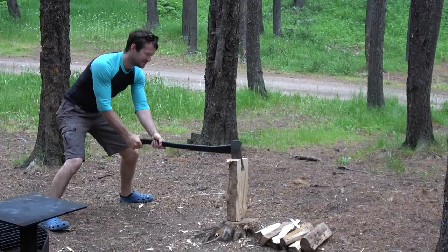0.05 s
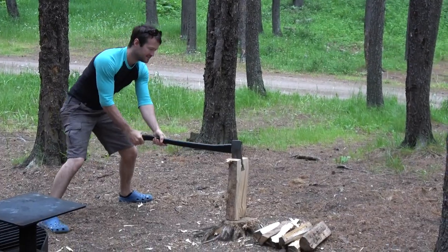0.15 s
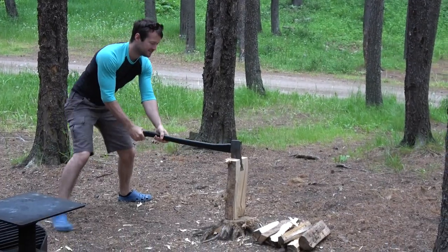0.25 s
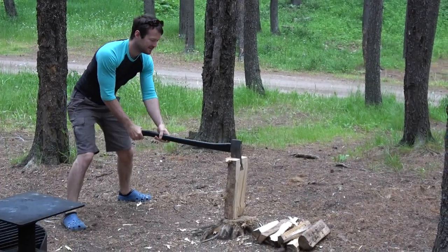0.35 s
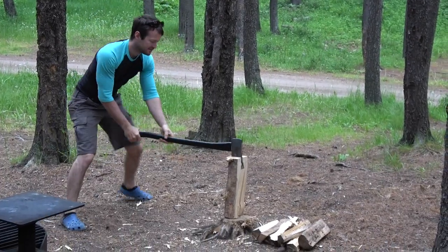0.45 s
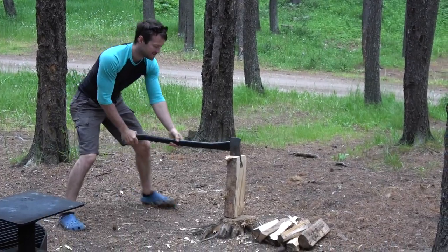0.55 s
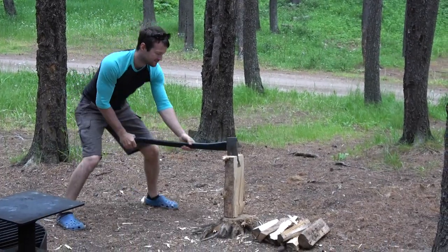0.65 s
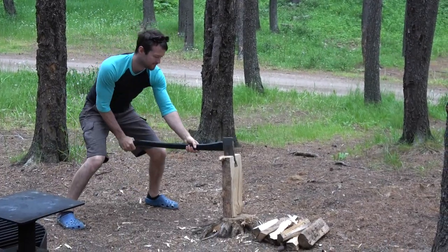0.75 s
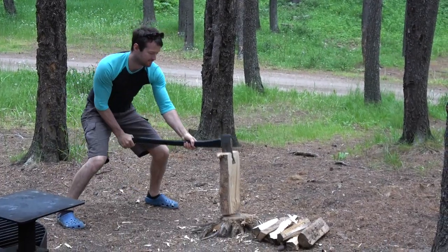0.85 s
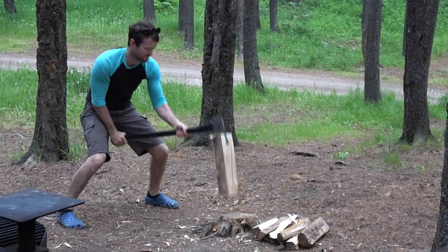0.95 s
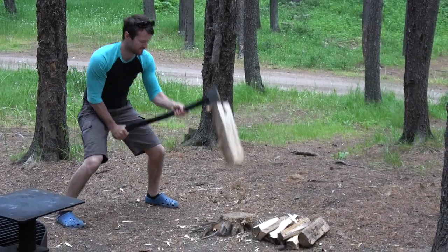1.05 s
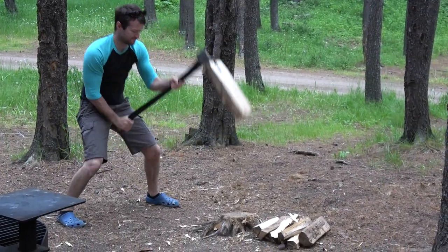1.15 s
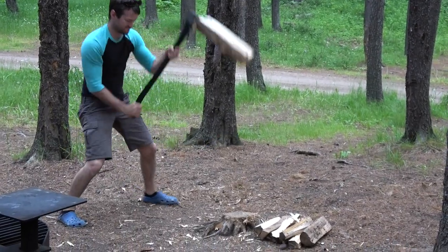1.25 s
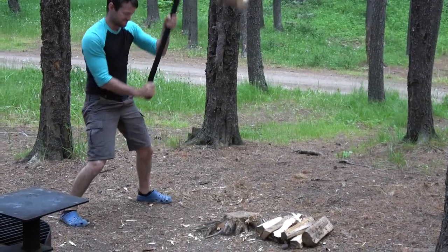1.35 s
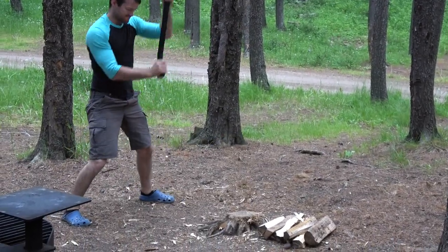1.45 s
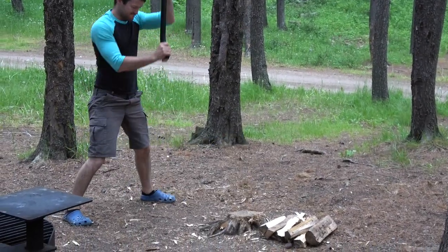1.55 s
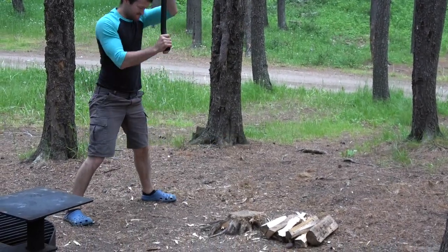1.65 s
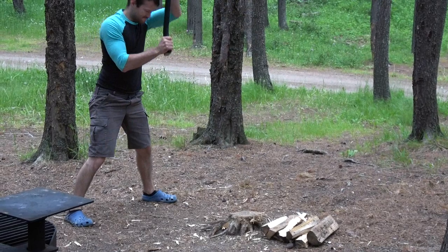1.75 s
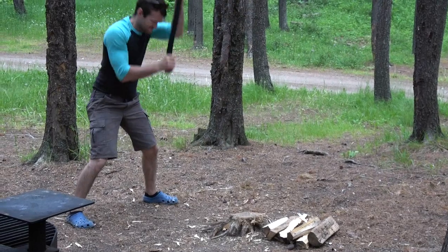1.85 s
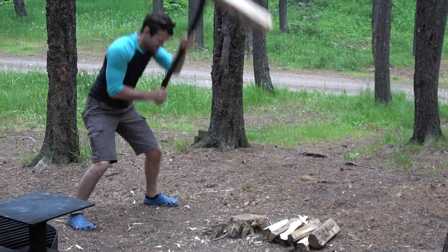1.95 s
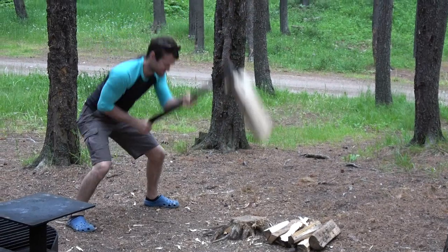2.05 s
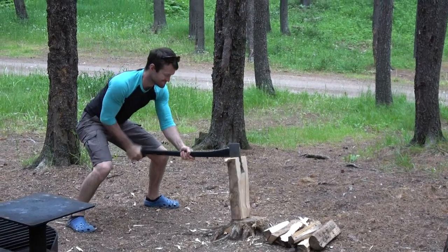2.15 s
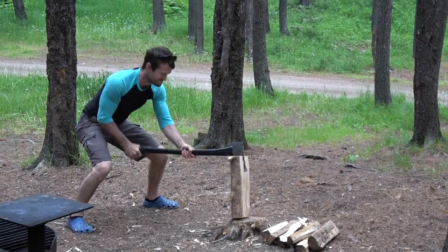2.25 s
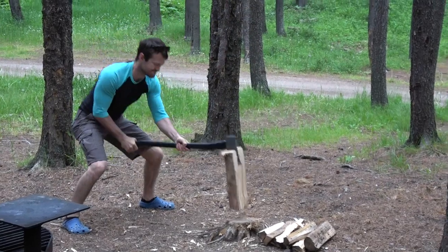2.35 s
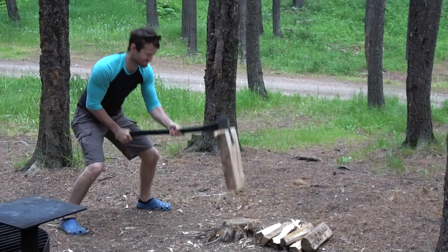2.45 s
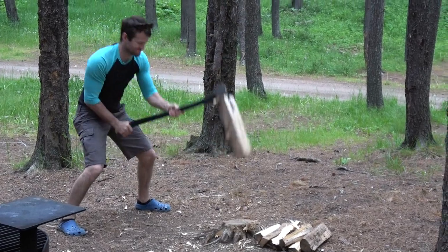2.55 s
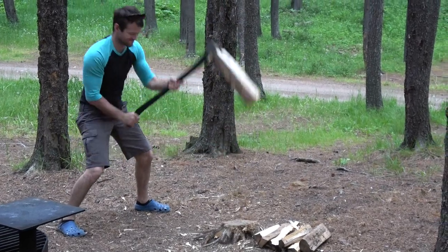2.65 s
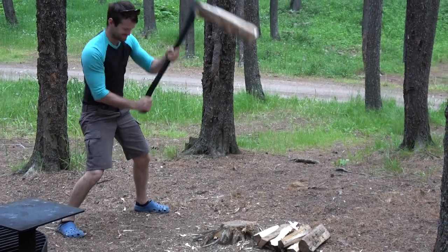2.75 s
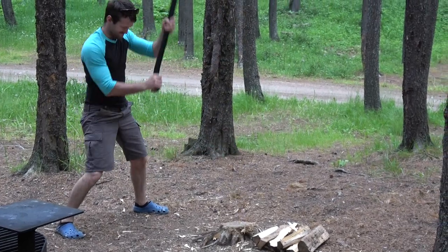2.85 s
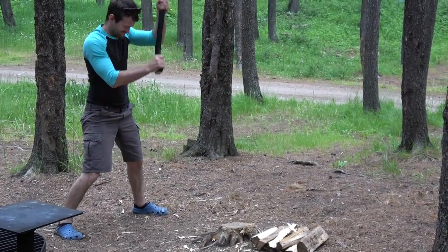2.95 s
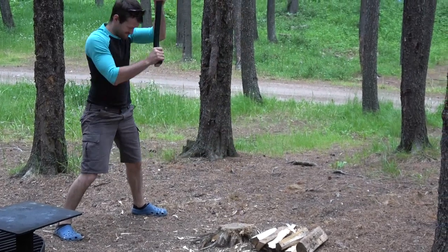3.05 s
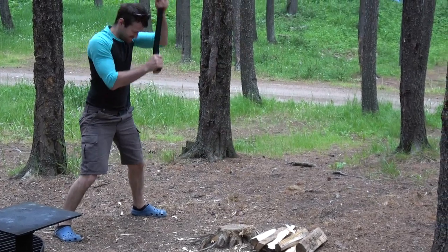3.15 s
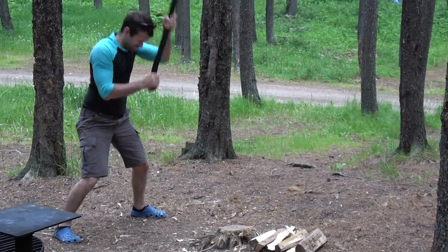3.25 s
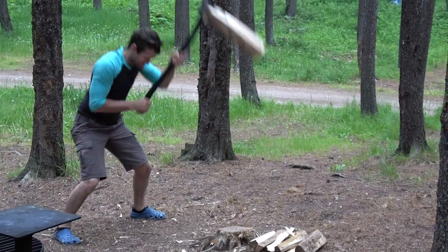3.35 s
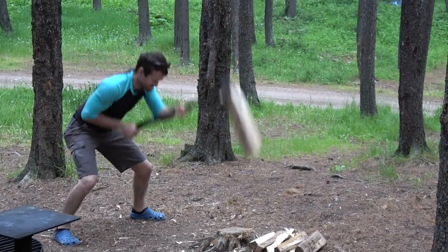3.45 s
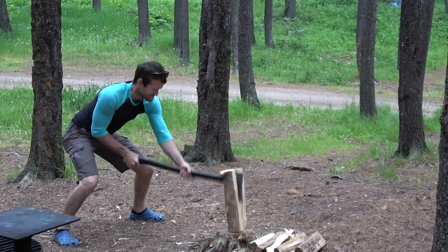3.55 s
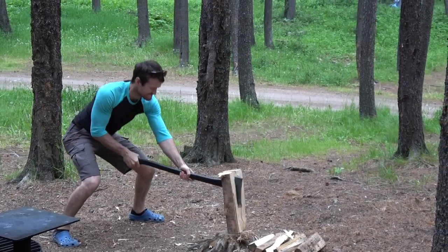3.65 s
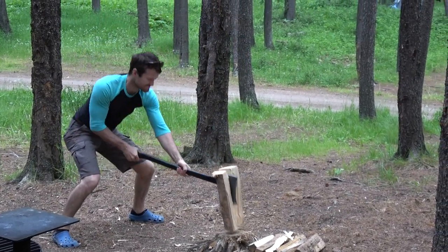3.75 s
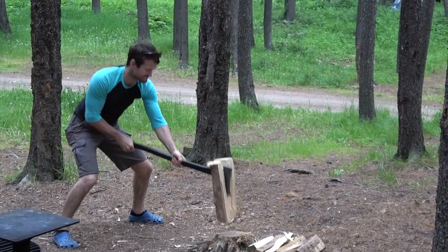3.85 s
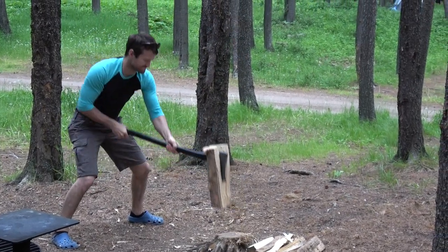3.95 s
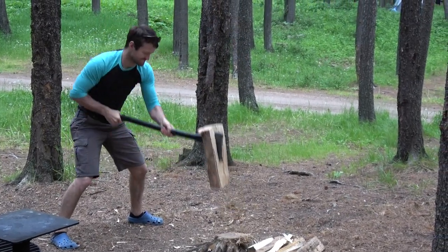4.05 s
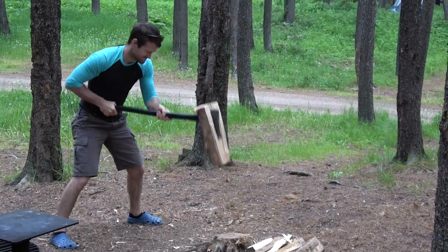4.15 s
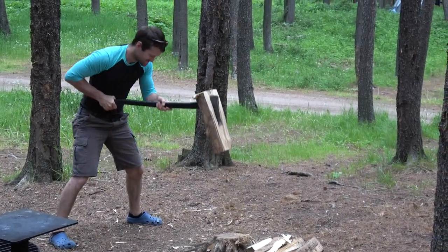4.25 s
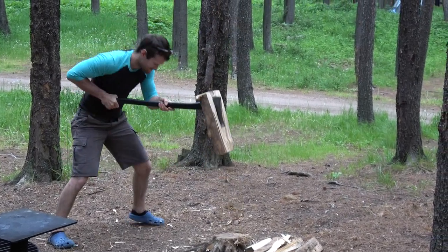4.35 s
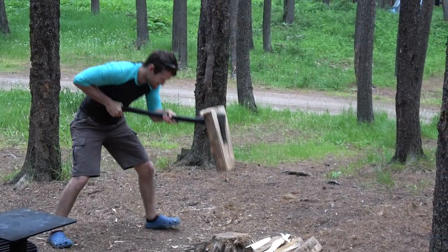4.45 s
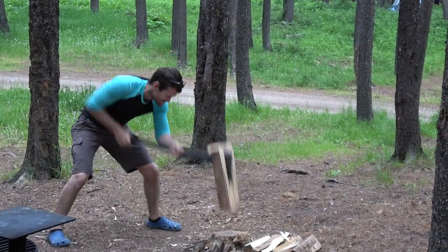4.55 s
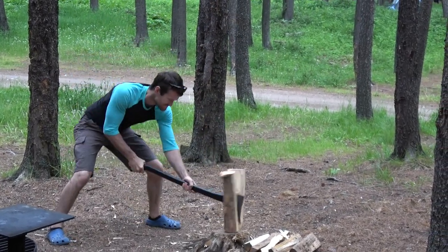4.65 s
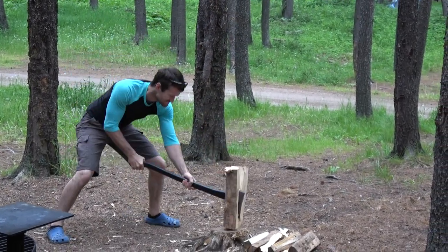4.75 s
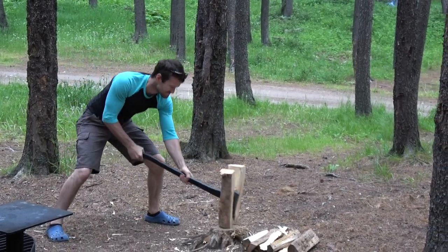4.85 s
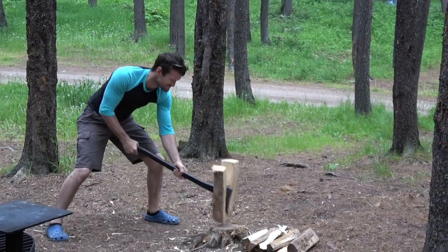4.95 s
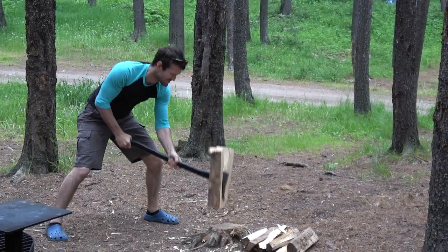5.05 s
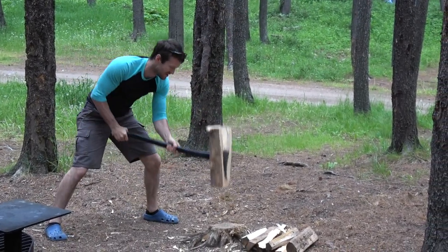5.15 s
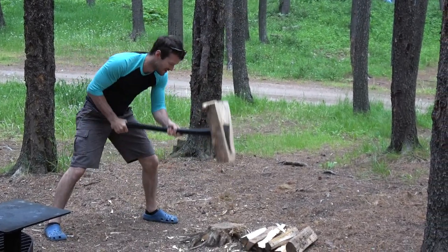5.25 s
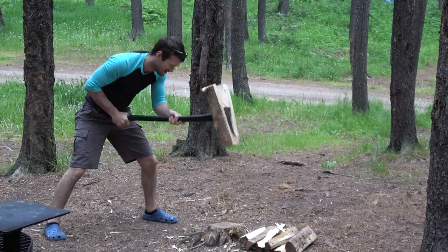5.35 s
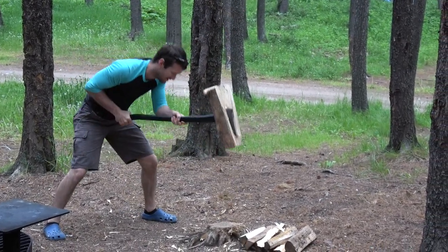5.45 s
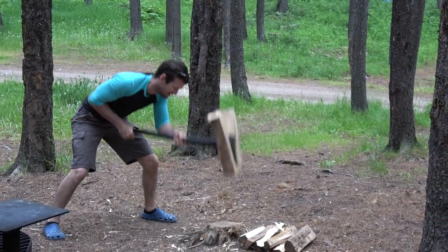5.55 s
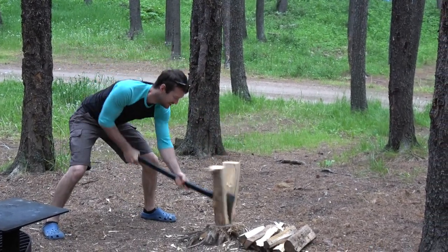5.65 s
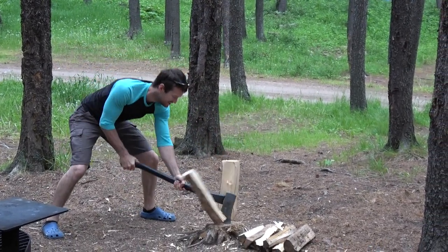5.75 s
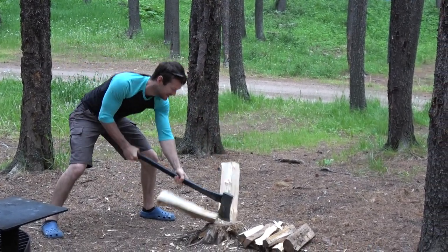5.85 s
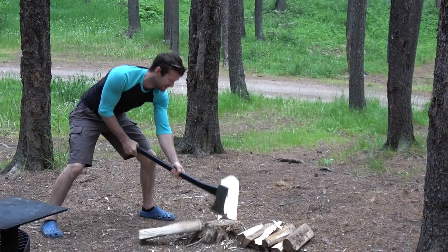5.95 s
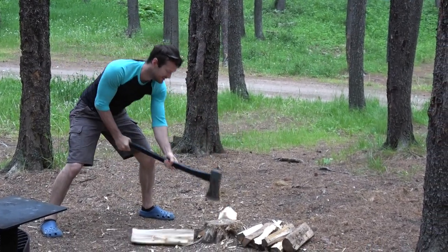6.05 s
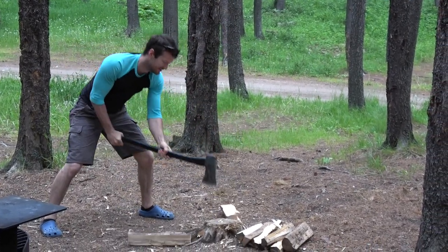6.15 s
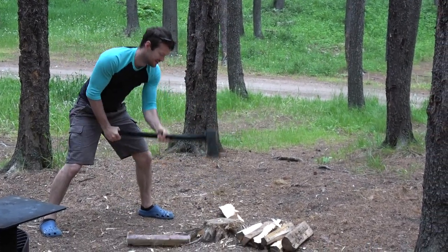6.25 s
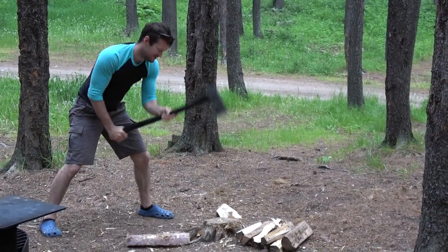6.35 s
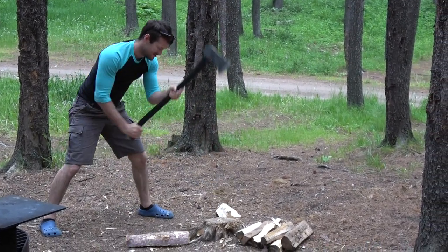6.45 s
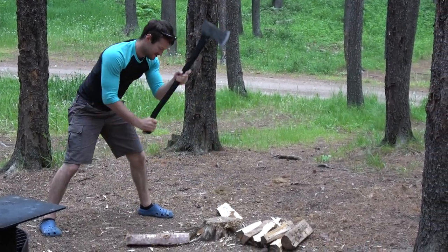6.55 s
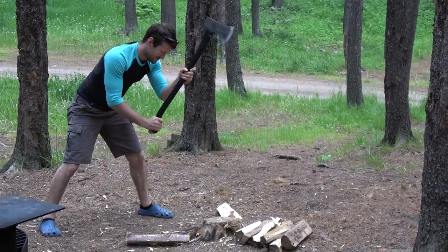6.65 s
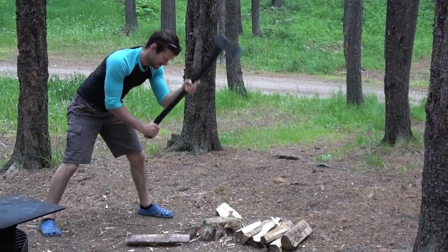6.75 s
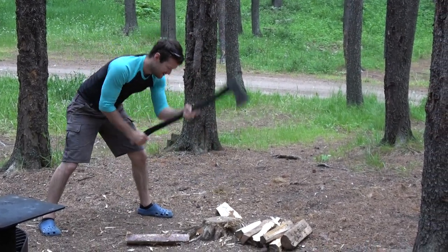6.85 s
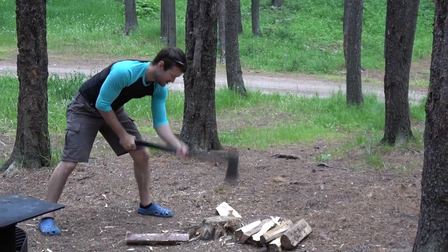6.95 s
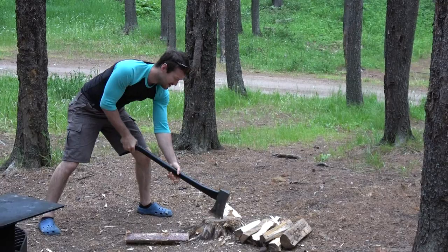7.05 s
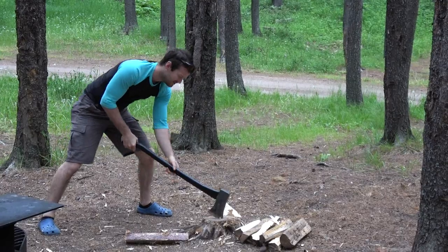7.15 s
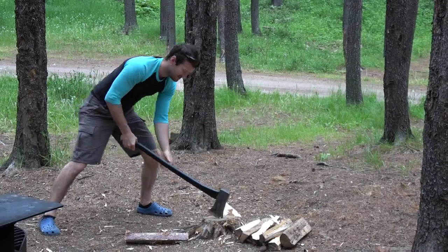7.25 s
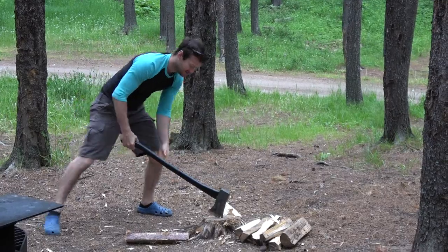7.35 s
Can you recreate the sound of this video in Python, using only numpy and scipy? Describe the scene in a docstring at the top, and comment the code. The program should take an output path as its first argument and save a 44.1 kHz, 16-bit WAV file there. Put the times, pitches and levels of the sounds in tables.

```python
"""A log stuck on an axe is slammed on a stump in a pine wood until it splits; the halves drop and the axe strikes one.
Each blow is a burst of noise for the cracking fibres, a ring of the log and a thud of stump and ground.
The blows bounce off things nearby and echo among the trunks as a fading wash of noise.
Shoes scuff dry needles in grainy noise, twigs tick in tiny fading tones, and the wood hushes far off.
A limiter holds down the hardest blows."""
import sys
import numpy as np
from scipy import signal
from scipy.fft import rfft, irfft, next_fast_len
from scipy.io import wavfile
from scipy.ndimage import uniform_filter1d, minimum_filter1d, map_coordinates

SR = 44100
rng = np.random.default_rng(int(sys.argv[2]) if len(sys.argv) > 2 else 0)


def ratio_of_db(decibels):
    """Turn decibels (scalar or array-like) into linear amplitude factors; 0 dB maps to 1."""
    return 10 ** (np.asarray(decibels, float) / 20)


def generate_wav(signal):
    """Clip the signal to [-1, 1] and save it as 16-bit WAV at the path in sys.argv[1]."""
    frames = np.transpose(np.atleast_2d(signal))
    scaled = np.clip(frames, -1, 1) * 32767
    pcm = np.round(scaled).astype(np.int16)
    wavfile.write(sys.argv[1], SR, pcm)


N = 326340  # samples in the scene
LEAD = SR  # samples made ahead of the start, so that an earlier blow can still echo

# Contacts of log, axe and stump; the row at 6.262 s is a twig tick, made the same way. Each row: start in
# seconds, then relative levels of crack, knock and thud in dB.
CONTACTS = [(-0.4, 7.5, -18, -10), (2.2887, 1.5, -3, -3.5), (2.3002, -17, -42, -14.5), (2.309, -7, -18, -4),
            (2.3164, -11, -19, -13.5), (3.0097, -21, -59, -53), (3.6933, -3.5, -13, -7),
            (3.6955, 0, -8, -17.5), (3.7072, 3.5, -1, 0.5), (3.7126, 3, -32, -14.5),
            (3.728, -16, -22, -19.5), (3.7433, -49, -19.5, -19.5), (3.764, -19, -25, -47),
            (4.6139, -38.5, -42, -57), (4.626, -38.5, -37.5, -59), (4.6471, -33.5, -42, -55),
            (4.6655, -32.5, -53, -53), (4.7649, 2.5, -11, -20.5), (4.7773, -26, -14.5, -20.5),
            (4.7867, -2, -14, -25), (4.7911, -12, -21, -20), (4.8011, -12.5, -10.5, -22),
            (4.8341, -19, -29, -33), (5.8091, -1.5, -17, -17.5), (5.8233, -48, -39, -23.5),
            (5.834, -21, -25, -21.5), (6.117, -25, -36.5, -29.5), (6.1497, -25.5, -41.5, -38),
            (6.175, -26.5, -44, -45), (6.2169, -25.5, -28.5, -28.5), (6.262, -27, -39, -49),
            (7.1672, -14.5, -31, -24), (7.1709, -40, -23.5, -15), (7.1896, -41, -33.5, -20.5),
            (7.237, -47, -44, -47)]
# A short dull noise just before each big blow. Each row: start in seconds, level in the log pitches in dB,
# level in the stump pitches in dB.
LEAD_INS = [(2.2738, -21.5, -33.5), (3.682, -28.5, -17), (4.75, -38.5, -37), (5.796, -38.5, -30),
            (7.158, -61, -30)]
# Ways the log rings before its brightness is tilted. Each row: pitch in Hz, width in Hz, relative level in dB.
LOG_RINGS = [(649, 126, -0.5), (898, 116, -4.5), (1145, 132, -2), (1678, 81, 3.5), (2210, 250, -6),
             (2960, 150, -6.5), (3840, 230, -6)]
# The loosest piece in each state of the wood; in the state from 6.245 s it is the ring of a ticking twig. Each
# row: pitch in Hz, width in Hz, relative level in dB.
LOOSE_PIECES = [(980, 60, -11), (689, 58, 1.5), (5000, 2500, 8), (1394, 125, 0.5), (1840, 90, 7),
                (2310, 910, 2), (1077, 23, 13), (910, 150, 5.5), (2920, 170, 26), (2080, 310, 6.5)]
# Ways the stump rings before its pitch is shifted. Each row: pitch in Hz, width in Hz, relative level in dB.
STUMP_RINGS = [(232, 84, -7), (318, 27.8, 1.5), (380, 28, -2), (467, 40, -2.5), (544, 117, -7.5)]
# The way the ground rings. Each row: pitch in Hz, width in Hz, relative level in dB.
GROUND_RINGS = [(115.2, 26.5, 0)]
# Tone colour of tearing fibres. Each row: frequency in Hz, relative level in dB.
CRACK_COLOUR = [(300, -40.5), (1000, 4), (3000, -0.5), (6500, -1.5), (10000, -9), (14500, -17),
                (16000, -44.5)]
# States of the wood. Each row: left over right in dB, log brightness in dB per octave, stump pitch factor,
# ground over stump in dB, time in seconds for the tearing to fall by 60 dB.
WOOD_STATES = [(2, -19, 2.2, -16.5, 0.069), (0.6, -6.5, 1.01, -22.5, 0.033), (-0.3, -9, 0.74, -35, 0.025),
               (0.5, -7.5, 0.993, -19, 0.049), (4, 1.5, 0.67, -8, 0.05), (1, 0.5, 1.05, -0.5, 0.038),
               (1.1, 4, .95, -7.5, 0.043), (0, -21, 0.91, 2, 0.037), (-0.5, 8, 0.84, 4, 0.0124),
               (2.5, -20.5, .9, -6, 0.026)]
# When each state of the wood begins. Each entry: start in seconds.
STATE_STARTS = [-1, 2.2, 2.95, 3.6, 4.55, 4.72, 5.7, 6.05, 6.245, 7.05]
# How much of the left-right lean each pitch shows. Each row: frequency in Hz, share.
LEAN_SHARE = [(100, 0.99), (300, 1.9), (1500, 1.4), (6000, .05)]
# Near bounces, unlike left and right. Each row: frequency in Hz, level in dB.
BOUNCE_COLOUR = [(100, -16), (300, -14.5), (1500, -12), (5000, -16.5), (9000, -8), (11500, -35.5)]
# How long the trunks echo. Each row: frequency in Hz, time to fall by 60 dB in seconds.
ECHO_TIME = [(100, 0.39), (260, 1.22), (700, 2.32), (1840, 1.36), (3500, 1.295), (5000, 1), (8000, 0.69),
             (12800, 0.45)]
# Tone colour of the echo. Each row: frequency in Hz, level in dB.
ECHO_COLOUR = [(100, -8), (300, -17.5), (1000, -10.5), (3000, -6.5), (8000, -7.5), (15000, -9.5)]
# Stereo width of the echo. Each row: frequency in Hz, side against mid in dB.
ECHO_WIDTH = [(100, -25), (300, -17.5), (1000, -22.5), (4000, -19), (9000, -2), (11500, -15)]
# The clearest twigs. Each row: start in seconds, relative level in dB, pitch in Hz.
CLEAR_TICKS = [(0.3631, -35, 7200), (0.482, -38, 5230), (0.5521, -41, 6570), (0.76, -38, 6320),
               (0.8048, -31, 3000), (0.8727, -40, 3500), (0.922, -41, 4500), (1.063, -37.5, 7500),
               (1.1817, -44, 6820), (1.244, -40, 5960), (1.478, -35, 3000), (2.8573, -49, 8100),
               (2.8727, -43, 7500), (2.9387, -49, 10500), (3.269, -47, 10100), (3.279, -42, 5960),
               (3.6647, -38.5, 5650), (3.9566, -34.5, 5050), (4.4767, -41.5, 5700), (4.5136, -40.5, 6140),
               (5.1696, -48, 5890), (6.5173, -43.5, 7960)]
# Shoes and wood sliding on needles. Each row: start in seconds, length in seconds, rustle level in dB,
# drag level at the end in dB.
SLIDES = [(0.243, 0.065, -62, -54.5), (0.384, .06, -50.5, -49), (0.455, 0.022, -48.5, -40.5),
          (.5, 0.082, -57, -52), (0.621, 0.051, -49, -50.5), (.7, 0.071, -50, -39.5),
          (0.775, 0.047, -50.5, -48.5), (0.858, 0.021, -54.5, -52.5), (.92, 0.22, -67, -67),
          (1.167, 0.094, -58, -52.5), (1.28, .09, -67, -62), (1.383, .092, -53, -40.5),
          (1.51, .07, -64.5, -56), (1.97, 0.1, -65.5, -72), (3.017, 0.08, -57, -54),
          (4.336, 0.054, -62, -49), (4.465, .06, -61, -48.5), (6.154, 0.022, -60, -47),
          (6.205, 0.034, -51, -45.5), (6.394, 0.055, -61.5, -64), (6.99, 0.095, -62, -69)]
# Tone colour of crushed needles. Each row: frequency in Hz, relative level in dB.
RUSTLE_COLOUR = [(1470, -23), (2500, 1.5), (4510, -4), (9220, -3.5), (14900, -12), (16000, -44)]
# Tone colour of the sliding sole. Each row: frequency in Hz, relative level in dB.
DRAG_COLOUR = [(120, -39), (200, -11.5), (580, -9.5), (958, -3.5), (1260, -7.5), (1620, -3.5),
               (4000, -23.5), (5200, -45), (8800, -120)]
# Tone colour of the far hush. Each row: frequency in Hz, relative level in dB.
HUSH_COLOUR = [(35, -45.5), (60, -5.5), (113, 3.5), (146, -8), (251, -9.5), (296, -8), (357, -12.5),
               (672, -6), (1100, -8), (1930, -16), (2680, -18), (3010, -20.5), (3550, -24.5),
               (13800, -30.5), (16300, -38)]
# Stereo width of hush and sough. Each row: frequency in Hz, side against mid in dB.
HUSH_WIDTH = [(60, -18), (180, -7.5), (550, -10.5), (1650, -12), (4970, -9.5), (10000, 0.5), (12000, -12)]
# A lower sough that comes and goes. Each row: time in seconds, level in dB.
SOUGH_LEVEL = [(0, -58), (.9, -60), (1.5, -78), (2.9, -55), (3.6, -58), (5.6, -59), (6.6, -57.5),
               (7.1, -53.5), (7.4, -77)]
# Tone colour of the sough. Each row: frequency in Hz, relative level in dB.
SOUGH_COLOUR = [(90, -37), (150, -8.5), (280, 0), (500, -3), (1000, -22), (2000, -48)]
# A faint far drone. Each row: time in seconds, level in dB.
DRONE_LEVEL = [(0, -89), (.5, -60), (1.05, -66), (1.5, -56.5), (2.2, -74), (3, -65.5), (7.4, -79)]
# Air stirring on the microphone ports. Each row: frequency in Hz, relative level in dB.
PORT_COLOUR = [(10, -3.5), (28, -5), (45, -13), (70, -12), (120, -45)]


def unit(x):
    """Scale to an rms (average strength) of 1."""
    return x / np.sqrt(np.mean(x ** 2) + 1e-20)


def along(points, hz):
    """Read a curve of (Hz, value) points, spaced by pitch."""
    f, v = np.transpose(points)
    return np.interp(np.log(hz + 1), np.log(f + 1), v)


def filtered(x, response):
    """Multiply the spectrum of x by a response that depends on frequency."""
    n = x.shape[-1]
    m = next_fast_len(n + 8192)  # room for the ring to die away
    return irfft(rfft(x, m) * response(np.fft.rfftfreq(m, 1 / SR)), m)[..., :n]


def modes(table):
    """Response of a body that rings at several pitches, a wider one dying sooner."""
    def response(f):
        total = 0
        for k, (centre, width, db) in enumerate(table):
            damping = 1j * f * width
            total = total + (-1) ** k * ratio_of_db(db) * damping / (centre ** 2 - f ** 2 + damping)
        return total
    return response


def wobble(rate):
    """A smooth random curve with rate knots a second."""
    knots = rng.standard_normal(int(N * rate / SR) + 4)
    return map_coordinates(knots, [np.arange(N) * rate / SR])


def stereo(pair, colour, side):
    """Colour two noises, take them as mid and side, and turn them to left and right."""
    def response(hz):
        return ratio_of_db(along(colour, hz)) * np.array([np.ones_like(hz), ratio_of_db(along(side, hz))])
    mid, diff = filtered(pair, response)
    return np.array([mid + diff, mid - diff])


def state_at(s):
    """Number of the state the wood is in at s seconds."""
    return np.searchsorted(STATE_STARTS, s) - 1


def log_at(s):
    """Rings of the log, tilted in brightness around 1000 Hz, plus the ring of the loosest piece."""
    tilt = WOOD_STATES[state_at(s)][1]
    tilted = [(hz, width, db + tilt * np.log2(hz / 1000)) for hz, width, db in LOG_RINGS]
    return tilted + [LOOSE_PIECES[state_at(s)]]


def stump_at(s):
    """Rings of the stump, shifted in pitch by the state of the wood."""
    factor = WOOD_STATES[state_at(s)][2]
    return [(hz * factor, width, db) for hz, width, db in STUMP_RINGS]


def burst(envelope):
    """Noise of tearing fibres, its broad colour evened out so that the wood alone colours it."""
    n = len(envelope)
    fibres = ratio_of_db(4.2 * np.repeat(rng.standard_normal(n // 20 + 1), 20)[:n])  # single fibres stand out
    z = rfft(envelope * fibres * rng.standard_normal(n))
    broad_power = np.abs(uniform_filter1d(np.abs(z) ** 2, size=100))
    y = irfft(z / np.sqrt(broad_power + 1e-20), n)
    y = y * (np.arange(n) < n // 2)
    return y * np.linalg.norm(envelope) / np.linalg.norm(y)


def push_on(table):
    """One short push sets a body ringing; its peak is scaled to 1."""
    t = np.arange(SR // 4) / SR
    push = np.exp(-((t - .001) / 0.00071) ** 2)
    ring = filtered(push, modes(table))
    return ring / np.abs(ring).max()


def blow(s, crack_db, knock_db, thud_db):
    """Fibres tear in a dying burst that rings the log; the weight pushes stump and ground once."""
    t = np.arange(SR // 4) / SR
    ground_db, tear_s = WOOD_STATES[state_at(s)][3:]
    dying = ratio_of_db(-60 * t / max(tear_s, .003)) * (1 - np.exp(-t / 0.00012))
    crack = filtered(burst(dying), lambda hz: ratio_of_db(along(CRACK_COLOUR, hz)))
    crack *= np.linalg.norm(dying) / np.linalg.norm(crack)
    knock = filtered(burst(dying), modes(log_at(s)))
    knock /= np.sqrt(np.mean(knock[:SR // 100] ** 2))  # rms 1 over the first 10 ms
    thud = push_on(stump_at(s)) + ratio_of_db(ground_db) * push_on(GROUND_RINGS)
    return ratio_of_db(crack_db - 9.5) * crack + ratio_of_db(knock_db - 3.5) * knock + ratio_of_db(thud_db + 7.5) * thud


def lead_in(s, log_db, stump_db):
    """Noise in the log and stump pitches, quickly up, then held until the next contact cuts it off."""
    t = np.arange(SR // 4) / SR
    end = min(row[0] for row in CONTACTS if row[0] > s)
    noise = rng.standard_normal((2, len(t)))
    log = ratio_of_db(log_db) * unit(filtered(noise[0], modes(log_at(s))))
    stump = ratio_of_db(stump_db) * unit(filtered(noise[1], modes(stump_at(s))))
    return (log + stump) * (t < end - s) * (1 - np.exp(-t / 0.0016))


def blows():
    """Set every blow and every short noise before one at its time."""
    out = np.zeros(LEAD + N + SR)
    for make, table in ((blow, CONTACTS), (lead_in, LEAD_INS)):
        for row in table:
            sound = make(*row)
            out[LEAD + round(row[0] * SR):][:len(sound)] += sound
    return out[:LEAD + N]


def bounces(x):
    """Ground, pile and table return the blow at once, in shifting phase, opposite on the two sides."""
    phase = unit(np.pad(wobble(700), (LEAD, 0), "wrap"))
    side = filtered(x * phase, lambda hz: ratio_of_db(along(BOUNCE_COLOUR, hz)))
    return np.array([side, -side])


def trunks(x):
    """Countless trunks scatter the energy of each moment into a wash; each frequency dies at its own speed."""
    frame = dict(fs=SR, nperseg=512, noverlap=384)
    hz, t, z = signal.stft(x, **frame)
    # the scatter keeps only the broad colour
    blur = np.exp(-(np.log((hz[:, None] + 150) / (hz + 150)) / 0.053) ** 2)
    power = blur / blur.sum(axis=0) @ np.abs(z) ** 2
    age = t[t < 2.5]
    t60 = along(ECHO_TIME, hz)[:, None]
    far_trunks = ratio_of_db(-120 * age / t60)
    near_ground_and_pile = 5 * ratio_of_db(-120 * age / (0.38 * t60))
    build_up = 1 - np.exp(-(age / 0.0032) ** 2)
    fall = (far_trunks + near_ground_and_pile) * build_up
    fall = fall / fall.sum(axis=1, keepdims=True)
    wash = np.abs(signal.fftconvolve(power, fall, axes=1))[:, :len(t)]
    grain = ratio_of_db(0.6 * np.pad(wobble(150), (LEAD, 0), "wrap"))  # single trunks stand out of the wash
    noise = signal.stft(rng.standard_normal((2, len(x))) * grain, **frame)[2]
    noise = noise / np.sqrt(np.mean(np.abs(noise) ** 2))
    echo = signal.istft(noise * np.sqrt(wash), **frame)[1][:, :len(x)]
    return stereo(echo, ECHO_COLOUR, ECHO_WIDTH)


def ticks():
    """A twig or needle snaps: a few cycles at its own pitch, rough; fainter ones fall at random."""
    out, t = np.zeros(N + SR), np.arange(SR // 100) / SR
    snaps = list(CLEAR_TICKS)
    faint_per_s = 1.5
    for when, size, pitch in rng.random((round(faint_per_s * N / SR), 3)):
        snaps.append((when * N / SR, -51 + 8 * (size - .5), 6000 * 2 ** (pitch - .5)))
    for s, db, hz in snaps:
        tone = np.sin(2 * np.pi * hz * t)
        roughness = 0.4 * np.diff(rng.standard_normal(len(t) + 1))
        tick = (tone + roughness) * ratio_of_db(db + 5.5 - 60 * t / 0.0016)  # falls by 60 dB in 1.6 ms
        out[round(s * SR):][:len(t)] += tick
    return out[:N]


def grains(spiky_db):
    """Two noises whose strength jumps quickly, like many tiny grains crushed."""
    return rng.standard_normal((2, N)) * ratio_of_db(spiky_db * wobble(900))


def scuffs():
    """Dry needles crush in dense grains while the sole slides; its duller, lumpier rasp swells until it stops."""
    attack_s = 0.045
    rustle_fade, drag_swell, drag_fade = 236, 107, 400  # dB per second
    t, rustle_power, drag_power = np.arange(N) / SR, np.zeros(N), np.zeros(N)
    for s, length, rustle_db, drag_db in SLIDES:
        begun = np.clip((t - s) / attack_s + .5, 0, 1)
        after = t - s - length  # seconds since the slide ended, negative before
        rustle_power += (begun * ratio_of_db(rustle_db - rustle_fade * np.maximum(after, 0))) ** 2
        drag_power += (begun * ratio_of_db(drag_db + np.minimum(drag_swell * after, -drag_fade * after))) ** 2
    needles = ratio_of_db(2.3 * wobble(60)) * unit(stereo(grains(1.2), RUSTLE_COLOUR, [(1000, -34)]))
    sole = ratio_of_db(2.7 * wobble(50)) * unit(stereo(grains(2.5), DRAG_COLOUR, [(1000, -28)]))
    return np.sqrt(rustle_power) * needles + np.sqrt(drag_power) * sole


def level(rows):
    """Loudness over time from (seconds, dB) points."""
    return ratio_of_db(np.interp(np.arange(N) / SR, *np.transpose(rows)))


def hush():
    """Far wind in the crowns is coloured noise, drifting a little, with a lower sough and a narrow drone."""
    air = unit(stereo(rng.standard_normal((2, N)), HUSH_COLOUR, HUSH_WIDTH))
    air *= ratio_of_db(-54 + .6 * wobble(1.5) + .4 * wobble(6))
    sough = level(SOUGH_LEVEL) * unit(stereo(rng.standard_normal((2, N)), SOUGH_COLOUR, HUSH_WIDTH))
    drone = unit(filtered(rng.standard_normal(N), modes([(114.7, 7.1, 0)])))
    return air + sough + level(DRONE_LEVEL) * drone


def scene():
    """Blows and ticks echo and lean left or right with the state of the wood; the scuffs lean left."""
    struck = blows() + np.pad(ticks(), (LEAD, 0))
    wood = (struck + bounces(struck) + trunks(struck))[:, LEAD:]
    leaning = filtered(wood, lambda hz: along(LEAN_SHARE, hz))
    lean_db = np.transpose(WOOD_STATES)[0][state_at(np.arange(N) / SR)]
    wood = wood + (ratio_of_db(lean_db * np.array([[.5], [-.5]])) - 1) * leaning
    return wood + scuffs() * ratio_of_db(np.array([[1.2], [-1.2]])) + hush()


def band_limit(x):
    """A steep low-pass at the top of the band."""
    return signal.sosfilt(signal.butter(12, 16450, fs=SR, output="sos"), x)


def record(dry):
    """A low cut, then a limiter that ducks just ahead of a peak and lets go within some milliseconds."""
    cut = filtered(dry, lambda hz: (1j * hz / (1j * hz + 68)) ** 4)
    needed = np.minimum(1, ratio_of_db(-.6) / (np.abs(cut).max(axis=0) + 1e-9))
    held = minimum_filter1d(needed, round(.008 * SR))
    gain = uniform_filter1d(held, round(.007 * SR))
    ports = ratio_of_db(-64.5) * unit(stereo(rng.standard_normal((2, N)), PORT_COLOUR, [(30, -15.5)]))
    return band_limit(cut * gain + ports)


dry = scene()
out = record(dry)
generate_wav(out)
```